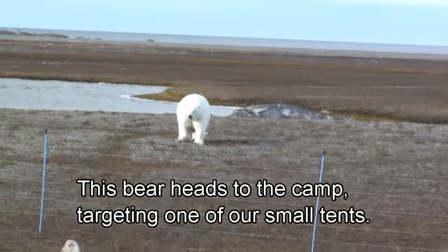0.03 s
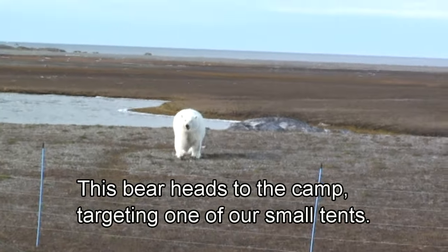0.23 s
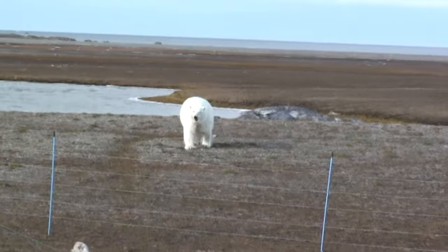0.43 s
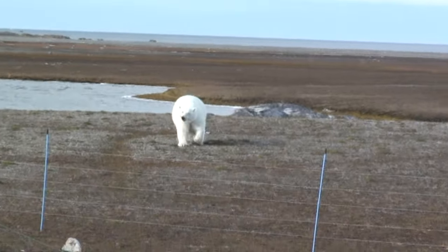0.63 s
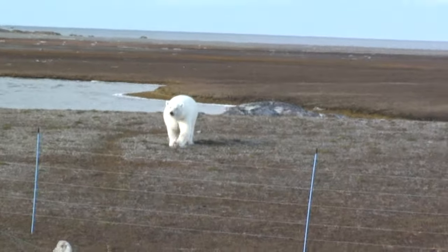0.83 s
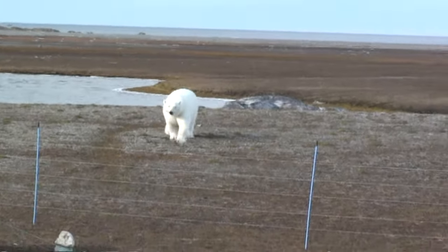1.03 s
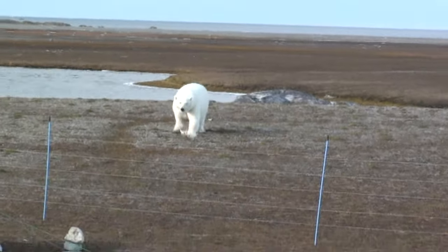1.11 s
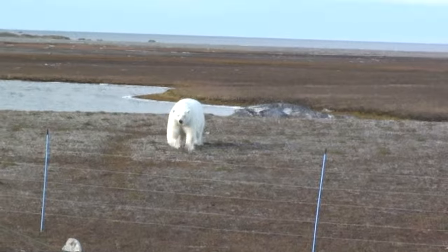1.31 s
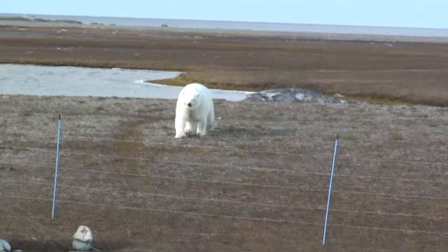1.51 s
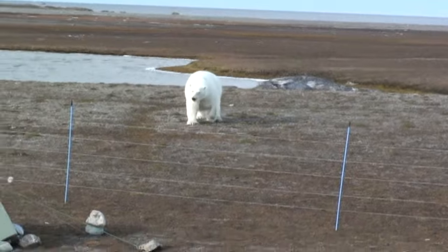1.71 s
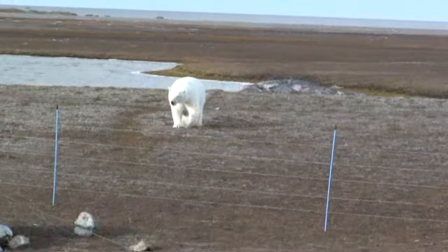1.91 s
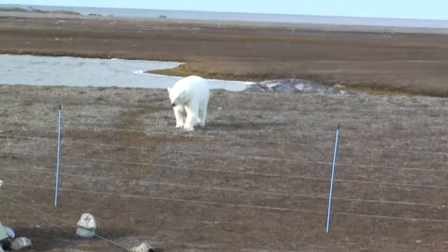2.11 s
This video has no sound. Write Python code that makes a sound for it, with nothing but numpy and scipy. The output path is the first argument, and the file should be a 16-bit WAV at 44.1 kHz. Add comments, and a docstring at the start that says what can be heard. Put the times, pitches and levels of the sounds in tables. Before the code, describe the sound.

An electric fence snaps sharply at about 0.6 and 1.85 seconds, slightly left, each a tiny bright crack with a very short ring. Soft wind hisses over open ground throughout, swelling a little between 0.6 and 1.4 seconds. Low, uneven gusts thump the microphone until about 1.6 seconds, with one hard slap just before the first snap. A few faint handling ticks sound close by.

```python
"""A soft hiss of wind on open tundra, and low thumps as gusts buffet the camera's microphone.
Close in, the hand that holds the camera makes a few faint ticks, and one hard eddy slaps the ports.
A little to the left an electric fence snaps twice, about a second and a quarter apart. Each spark
strikes twice in quick succession, rings the fence hardware and scatters off the ground nearby."""
import sys
import numpy as np
from scipy import signal
from scipy.fft import rfft, irfft
from scipy.io import wavfile
from scipy.ndimage import uniform_filter1d

SR = 44100
rng = np.random.default_rng(int(sys.argv[2]) if len(sys.argv) > 2 else 0)


def wav_out(sig):
    """Save sig, one row per channel (or a flat mono array), as 16-bit PCM at SR to the path in sys.argv[1]."""
    wavfile.write(sys.argv[1], SR, np.round(np.clip(np.atleast_2d(sig).T, -1, 1) * 32767).astype(np.int16))


N = 94815

# Steady outdoor hush with the microphone's own hiss. Each row: frequency in Hz, relative density in dB.
HUSH_SPECTRUM = [(20, -12), (70, 3.5), (200, 0.5), (400, 0), (800, -2.5), (1500, -4.5), (3000, -9.5),
                 (7000, -12.5), (11000, -16.5), (14000, -16.5), (14700, -54)]
# The wind hiss that swells above it. Each row: frequency in Hz, relative density in dB.
HISS_SPECTRUM = [(300, -1.5), (900, -3), (1700, -2), (3000, -6.5), (4700, -8.5), (6300, -6), (8200, -8.5),
                 (9800, -17), (13000, -28)]
# The rise and fall of that hiss. Each row: time in seconds, level in dB.
HISS_SWELLS = [(0, -64), (.08, -96), (.5, -75), (.6, -68.5), (.66, -60.5), (.78, -65.5), (.9, -65.5),
               (1.05, -64), (1.24, -60), (1.4, -65.5), (1.55, -72.5), (1.8, -75), (2.15, -69.5)]
# How alike the microphone's two channels are. Each row: frequency in Hz, left-right correlation.
CHANNEL_LIKENESS = [(60, 1), (300, 0.56), (700, 0.34), (1500, 0.68), (3000, 0.6), (7000, 0.89),
                    (14000, 0.91)]
# Gusts right on the microphone. Each row: peak time in seconds, half width in seconds, level in dB,
# lower edge in Hz, upper edge in Hz, relative rasp of small eddies in dB.
MIC_GUSTS = [(.085, 0.06, -55.5, 50.4, 171, -24), (0.167, 0.015, -54, 50, 123, -26),
             (.221, .009, -33.5, 59.5, 236, -36), (0.245, 0.011, -33.5, 85, 269, -36),
             (0.286, 0.048, -49.5, 65.6, 170, -54), (.326, 0.0086, -39, 111, 255, -38),
             (0.341, .011, -43.5, 45, 130, -44), (.400, 0.047, -59, 55, 195, -33),
             (0.471, 0.011, -39, 57, 230, -26), (0.492, 0.02, -45, 110, 223, -33),
             (.518, 0.0097, -33.5, 58, 270, -28), (0.565, 0.028, -39.5, 70, 212, -38),
             (0.588, 0.0051, -34, 129, 212, -61), (.628, 0.031, -54, 44.7, 158, -35),
             (.725, 0.046, -54, 98, 398, -20), (0.763, 0.011, -44.5, 65, 177, -27),
             (.800, 0.031, -59.5, 70, 267, -28), (0.843, 0.0087, -42.5, 54.6, 177, -36),
             (.885, 0.024, -55.5, 70, 184, -27), (0.946, 0.013, -46, 67, 213, -23),
             (.982, 0.019, -49, 55, 160, -39), (1.098, 0.019, -53, 48, 160, -31),
             (1.127, 0.011, -51.5, 79, 225, -28), (1.152, 0.0091, -46.5, 54, 132, -39),
             (1.204, 0.076, -57, 63.6, 195, -22), (1.292, 0.021, -50, 98, 402, -36),
             (1.335, .012, -46, 80, 187, -44), (1.365, 0.035, -47, 70, 177, -40),
             (1.424, 0.0084, -46, 89, 300, -25), (1.457, .018, -37.3, 110, 300, -16),
             (1.484, 0.018, -38, 90, 278, -20), (1.540, 0.038, -49, 117, 374, -16.5),
             (1.575, 0.036, -50, 96, 202, -40), (1.876, .034, -59.5, 55, 166, -33)]
# The hand on the camera. Each row: start in seconds, level in dB, centre in Hz, width in octaves,
# decay in seconds.
HANDLING_TICKS = [(.166, -56, 2570, 0.46, 0.0038), (.323, -55.5, 2670, 1.1, 0.0041),
                  (.406, -58, 2400, .7, .0045), (.5467, -51, 7500, 0.26, .0008),
                  (.5505, -46, 5400, 0.28, 0.0007), (.556, -52.5, 2530, 0.38, 0.0027),
                  (.969, -53, 1300, 0.81, 0.0034), (1.130, -56, 1800, 1, 0.0021),
                  (1.1648, -41, 750, 1.06, 0.0023), (1.253, -60.5, 2540, 0.45, 0.0074),
                  (1.3274, -56, 1400, 0.97, .003), (1.4195, -42, 700, .45, .003),
                  (1.645, -53.5, 1070, 0.5, 0.0047), (2.0183, -54.5, 1180, 0.48, .003)]
# Strikes at the fence, two to a snap. Each row: start in seconds, level in dB, pitch of the crack in Hz,
# relative ring in dB, relative scattered tail in dB, tail decay in seconds.
SPARK_STRIKES = [(.5910, -27, 9200, -20, -11, .0012), (.5940, -29, 8500, -19, -13, .0016),
                 (1.8466, -28, 8800, -15.5, -13, .0026), (1.8476, -37.5, 8070, -13, -6, .003)]
# The ring of the sparking hardware. Each row: frequency in Hz, relative level in dB,
# time to fall 60 dB in seconds.
HARDWARE_MODES = [(1440, -19, .07), (1650, -19, .065), (2958, -20, .06), (3635, -15, .045),
                  (4400, -14, .035), (6675, -14, .03), (7767, -1, .032), (8155, -1, .034), (8560, -4, .036),
                  (9340, -4, .028), (10112, -3, .033), (10420, -7, .028), (12000, -16, .022)]
# The snap off the ground and things nearby. Each row: frequency in Hz, relative density in dB.
SCATTER_SPECTRUM = [(500, -42), (1400, -18), (2500, -20), (4000, -13), (6300, -15), (8000, -6.5),
                    (10300, 0), (11200, -13), (12300, -11), (14500, -22)]


def amp(db):
    return 10 ** (np.asarray(db) / 20)


def unit(x):
    """Scales to rms 1."""
    return x / np.sqrt(np.mean(x ** 2) + 1e-20)


def read(points, hz):
    """Reads a table along a log-frequency axis."""
    f, value = np.transpose(points)
    return np.interp(np.log(hz + 1), np.log(f + 1), value)


def pan(db):
    """Gains of the two channels for a left-minus-right level."""
    return amp([[db / 2], [-db / 2]])


def add(mix, s, sound):
    """Mixes a stereo sound in at s seconds."""
    at = round(s * SR)
    part = mix[:, max(at, 0):max(at + sound.shape[1], 0)]
    part += sound[:, max(-at, 0):][:, :part.shape[1]]


def colour(x, gain):
    """Filters by a gain that is a function of frequency."""
    hz = np.fft.rfftfreq(x.shape[-1], 1 / SR) + 1e-3
    return irfft(rfft(x) * gain(hz), x.shape[-1])


def stereo_noise(size):
    """White noise in two channels, more alike at some frequencies than at others."""
    left, other = rng.standard_normal((2, size))
    same = lambda hz: np.clip(read(CHANNEL_LIKENESS, hz), -1, 1)
    right = colour(left, same) + colour(other, lambda hz: np.sqrt(1 - same(hz) ** 2))
    return np.array([left, right])


def air(spectrum, patchy_db):
    """Wide noise whose level wavers in patches of time and frequency."""
    hz, _, bands = signal.stft(stereo_noise(N), SR, nperseg=1024, noverlap=768)
    patches = uniform_filter1d(rng.standard_normal(bands.shape[1:]), size=14, axis=0)
    patches = unit(uniform_filter1d(patches, size=10, axis=1))
    bands = bands * amp(read(spectrum, hz)[:, None] + patchy_db * patches)
    return unit(signal.istft(bands, SR, nperseg=1024, noverlap=768)[1][:, :N])


def wind():
    """Air over open ground: a steady hush all round, a soft swelling hiss slightly to the left."""
    hush = amp(-64.5) * air(HUSH_SPECTRUM, patchy_db=0.86)
    swell = amp(np.interp(np.arange(N) / SR, *np.transpose(HISS_SWELLS)))
    return hush + swell * pan(db=1.5) * air(HISS_SPECTRUM, patchy_db=0.9)


def turbulence(swell):
    """A swell of random pressure with an even spectrum."""
    spectrum = rfft(rng.standard_normal(len(swell)) * swell)
    return irfft(spectrum / (abs(spectrum) + 1e-12), len(swell)) * np.sqrt(swell)


def across_ports(x, lag_s):
    """The left channel lags as an eddy drifts from the microphone's right port to its left."""
    return colour(x, lambda hz: np.exp(1j * np.pi * hz * lag_s * np.array([[-1], [1]])))


def gusts():
    """Short swells of turbulent pressure on the microphone; each gust has its own upper edge and rasp."""
    out, t = np.zeros((2, N)), np.arange(-8192, 8192) / SR
    rasp_hz, local_db = 940, -10.5
    roll_off = lambda ratio, slope: 1 / np.hypot(1, ratio ** slope)
    for peak, width, db, low_hz, high_hz, rasp_db in MIC_GUSTS:
        swell = 1 / np.cosh(np.clip(np.pi / 2 * t / width, -50, 50))
        shared, local = turbulence(swell), turbulence(swell)
        eddies = shared + amp(local_db) * np.array([local, -local])  # each port has a part of its own
        top = lambda f: roll_off(f / high_hz, 4.27) + amp(rasp_db) * roll_off(f / rasp_hz, 5.6)
        thump = colour(eddies, lambda f: roll_off(low_hz / f, 2.7) * top(f))
        ports = np.array([unit(port) for port in across_ports(thump, lag_s=.00048)])
        add(out, peak + t[0], amp(db) * ports * np.sqrt(np.mean(swell ** 2)))
    return out


def handling_ticks():
    """Small dry ticks of the camera body under the hand, close to the microphone."""
    out, t = np.zeros((2, N)), np.arange(2048) / SR
    rise_s = .00036
    for start, db, hz, octaves, decay in HANDLING_TICKS:
        band = lambda f: 1 / (1 + (np.log2(f / hz) / octaves) ** 2 / 2) ** 2
        grain = unit(colour(stereo_noise(len(t)), band))
        add(out, start, amp(db) * grain * (1 - np.exp(-t / rise_s)) * np.exp(-t / decay))
    return out * pan(db=2.5)


def eddy_slap():
    """One hard eddy on the microphone: a sharp cusp of suction, then a rounder push."""
    peak_s, gap_s, suction_s, push_s, low_cut_hz = .5307, .00361, .00062, .00047, 45
    t = np.arange(N) / SR - peak_s
    suction = amp(-19) * np.exp(-abs(t) / suction_s)
    push = amp(-18.5) / (1 + ((t - gap_s) / push_s) ** 2)
    pressure = colour(push - suction, lambda f: 1 / (1 + (low_cut_hz / f) ** 2))
    return across_ports(pressure, lag_s=.0003)  # a fast eddy crosses the ports sooner


def fence_sparks():
    """Left of the microphone, each strike is a bright crack, a short ring and a scattered tail."""
    out, t = np.zeros((2, N)), np.arange(4096) / SR
    rise_s, crack_s, scatter_rise_s = .0001, .0007, .0002
    for start, db, hz, ring_db, tail_db, decay in SPARK_STRIKES:
        crack = np.exp(-t / crack_s) * np.sin(2 * np.pi * hz * t)
        ring = sum(amp(mode_db - 60 * t / t60) * np.sin(2 * np.pi * (mode_hz * t + rng.random()))
                   for mode_hz, mode_db, t60 in HARDWARE_MODES)
        scatter = unit(colour(stereo_noise(len(t)), lambda f: amp(read(SCATTER_SPECTRUM, f))))
        near = np.exp(-t / decay)
        far = amp(-16) * np.exp(-t / (3.4 * decay))  # from farther off: weaker, and lasts longer
        tail = scatter * (1 - np.exp(-t / scatter_rise_s)) * (near + far)
        strike = crack + amp(ring_db) * ring + amp(tail_db) * tail
        add(out, start, amp(db) * (1 - np.exp(-t / rise_s)) * strike)
    return out * pan(db=4.5)


def scene():
    """Everything that reaches the hand-held microphone."""
    return wind() + gusts() + handling_ticks() + eddy_slap() + fence_sparks()


def record(dry):
    """The camera's band limit takes off the highest treble."""
    cutoff_hz = 14550
    low_pass = signal.firwin(511, cutoff_hz, window=("kaiser", 9), fs=SR)
    return signal.oaconvolve(dry, low_pass[None], "same")


dry = scene()
out = record(dry)
wav_out(out)
```